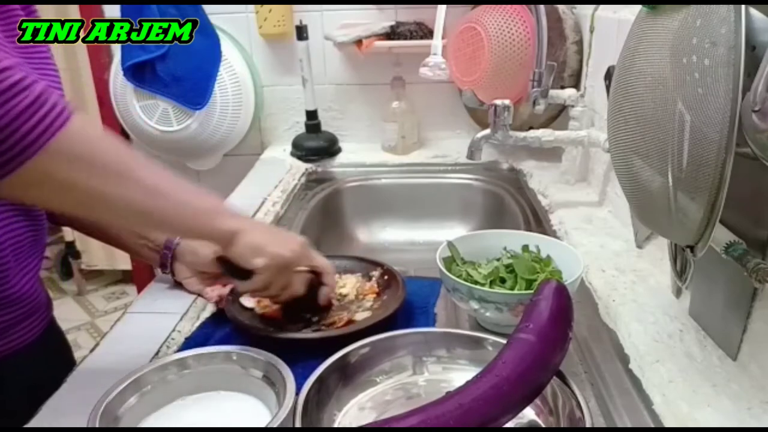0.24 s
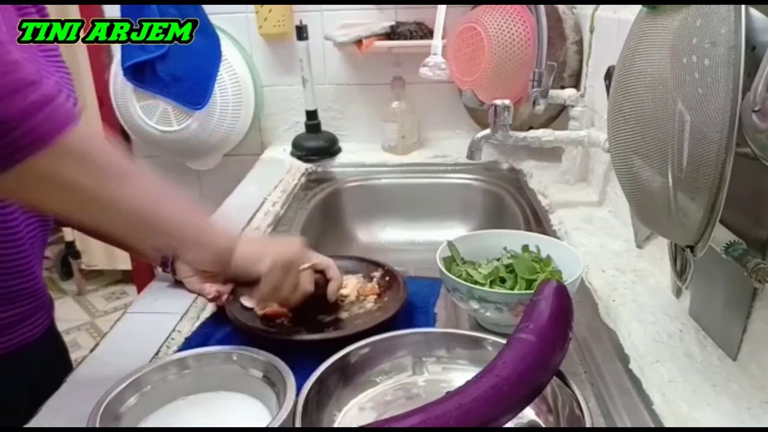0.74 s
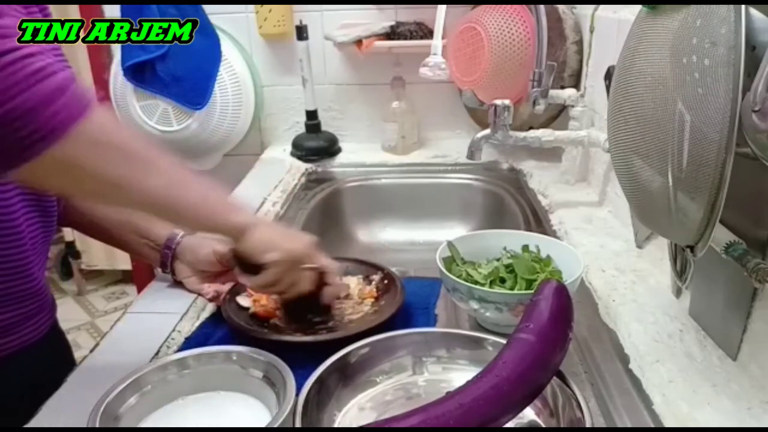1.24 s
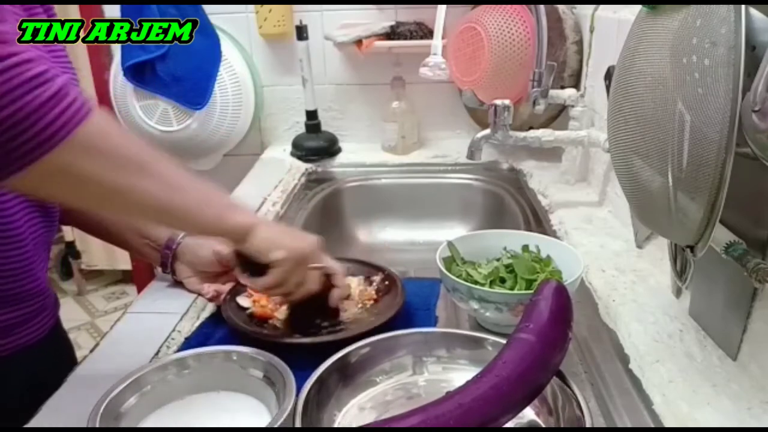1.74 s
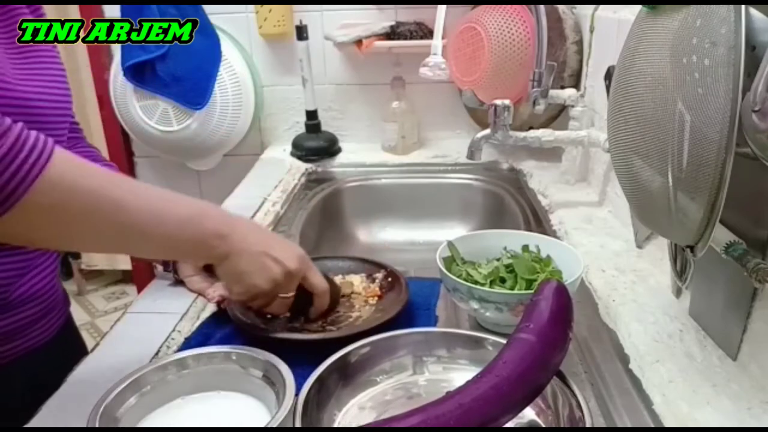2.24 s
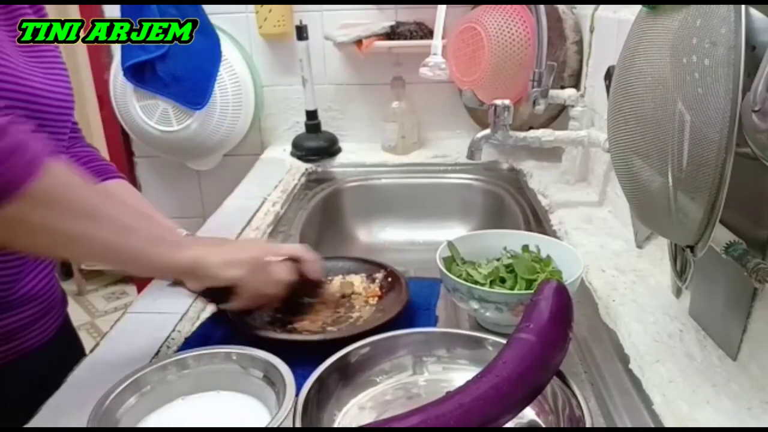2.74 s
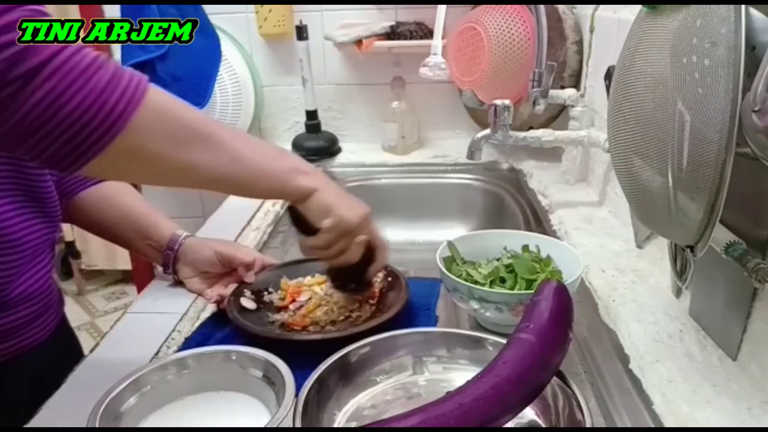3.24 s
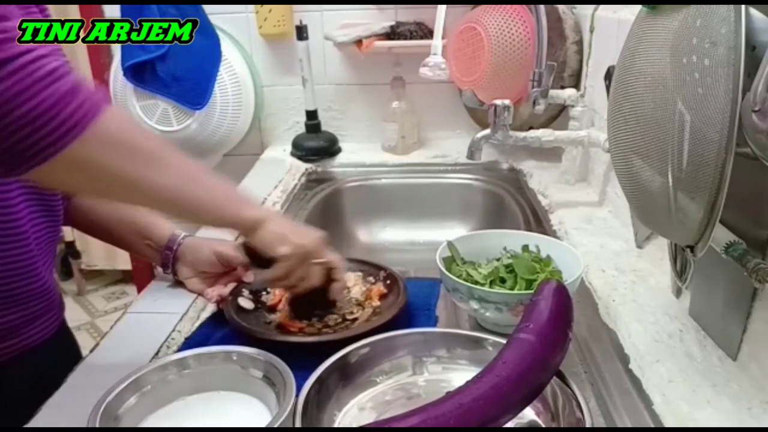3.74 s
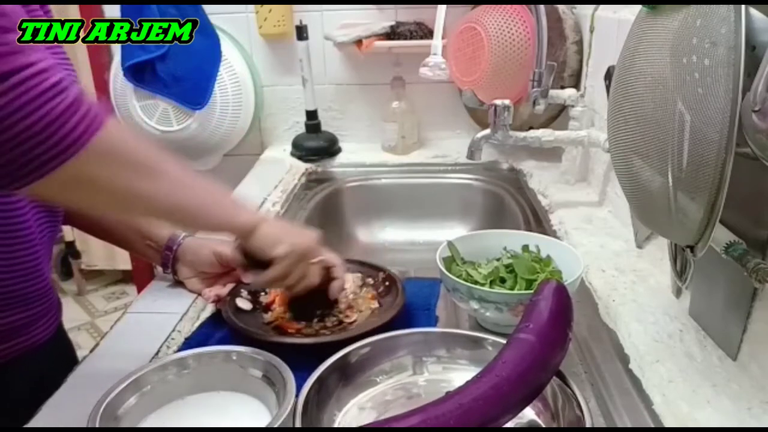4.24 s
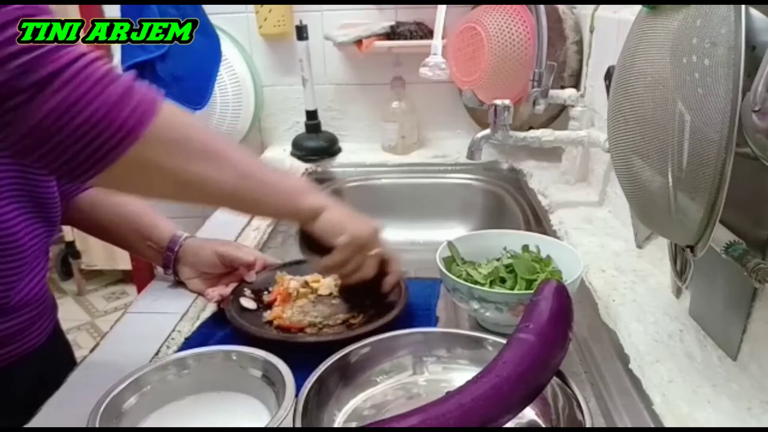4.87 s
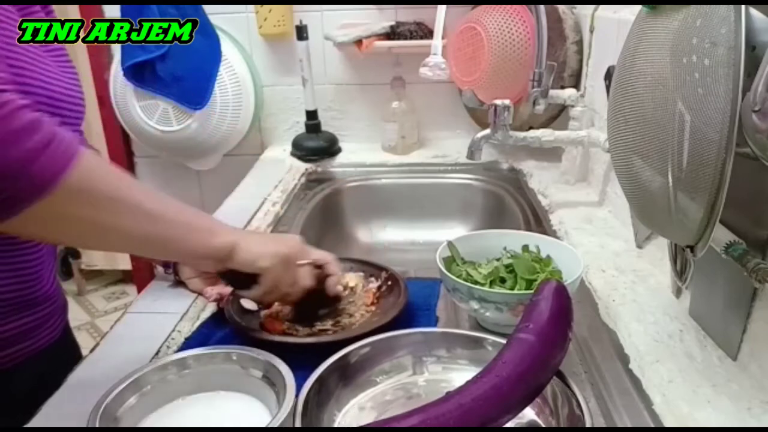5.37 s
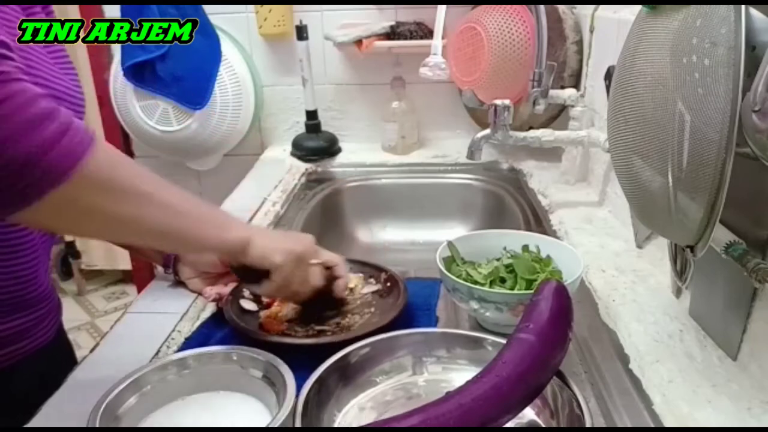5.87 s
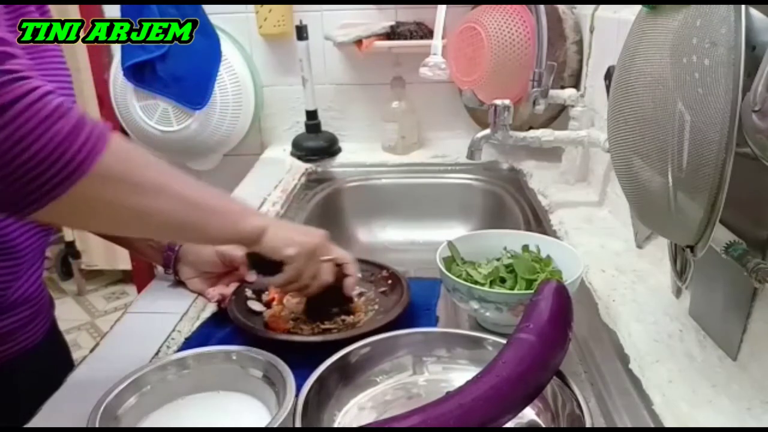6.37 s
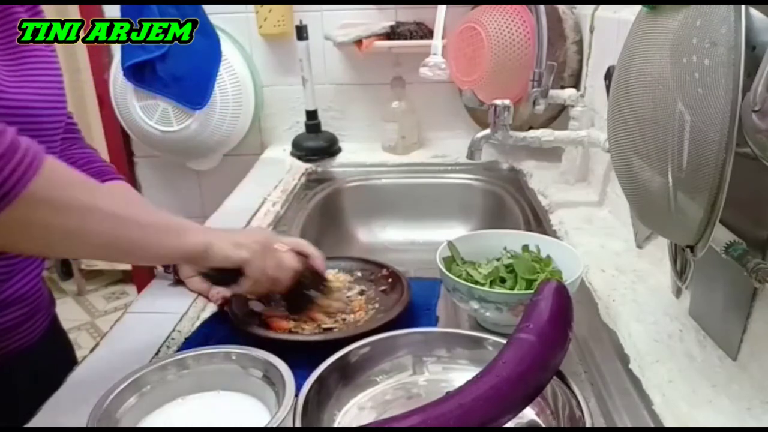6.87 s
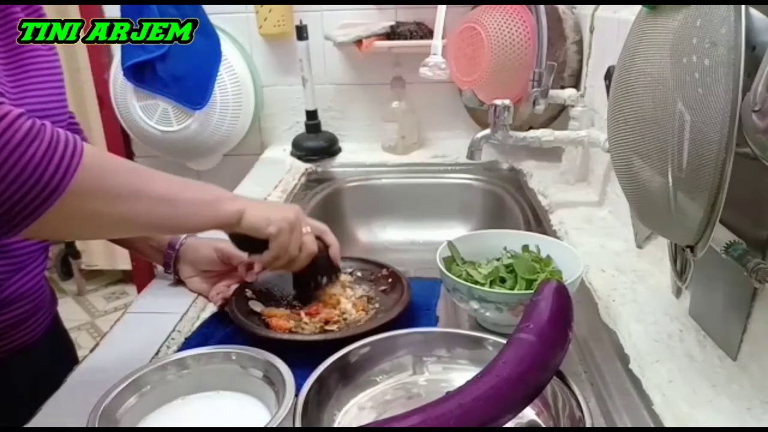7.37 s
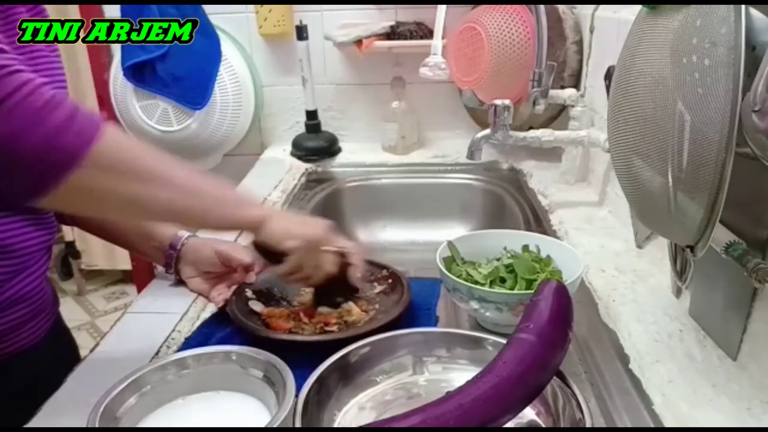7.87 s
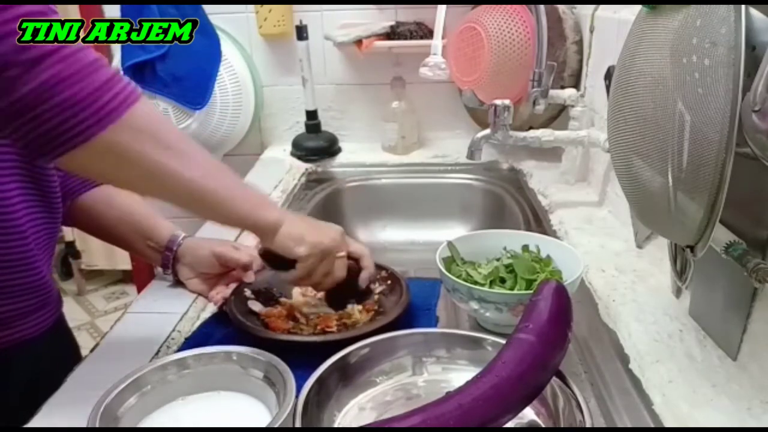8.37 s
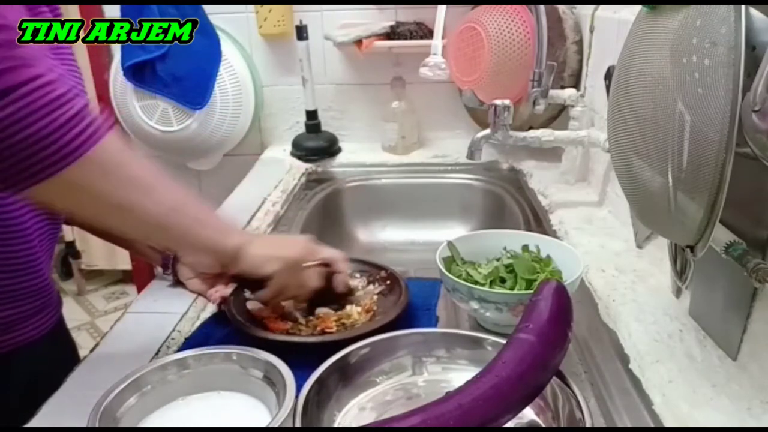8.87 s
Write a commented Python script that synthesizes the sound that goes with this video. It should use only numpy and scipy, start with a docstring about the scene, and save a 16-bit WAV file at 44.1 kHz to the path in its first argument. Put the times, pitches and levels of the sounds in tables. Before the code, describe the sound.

A stone pestle rubs spices around a shallow stone mortar in quick, gritty, uneven strokes. The scrapes come in rounds with brief pauses, mixed with small crunches and knocks that ring the bowl briefly. One harder knock lands about two thirds of the way through. The counter rumbles softly under the pushes. It is heard close up in a home kitchen with a short echo, a low hum and faint room noise.

```python
"""Quick, gritty strokes come in rounds: a stone pestle rubbing spices round a shallow stone mortar.
Crushed grit and knocks of stone on stone ring the bowl; the tiled kitchen counter rumbles with the pushes.
Behind it lie a low hum, a few thin far tones and faint room noise.
Two microphones, a few centimetres apart, hear the mortar directly and the kitchen's short echo after it."""
import sys
import numpy as np
from scipy import signal
from scipy.fft import rfft, irfft, next_fast_len
from scipy.io import wavfile
from scipy.ndimage import uniform_filter1d

SR = 44100
rng = np.random.default_rng(int(sys.argv[2]) if len(sys.argv) > 2 else 0)


def materialize(psi):
    """Save the field psi as 16-bit PCM at rate SR to the path in sys.argv[1].

    A 1-D psi becomes a single channel; in a 2-D psi each row is a channel.
    """
    bounded = np.clip(np.atleast_2d(psi).T, -1, 1)
    quanta = np.round(bounded * 32767).astype(np.int16)
    wavfile.write(sys.argv[1], SR, quanta)


N = 401745
FFT_SIZE = next_fast_len(N + 8192, real=True)
TIME_S, FFT_HZ = np.arange(N) / SR, np.fft.rfftfreq(FFT_SIZE, 1 / SR)
TICKS_S = np.arange(0, N + 44, 44) / SR  # control points for the envelopes

# The ring that the rubbing drives hardest, moving with the pestle's place in the bowl: time_s, pitch_hz
PESTLE_PATH = [(0.0, 2970), (0.1, 1820), (0.15, 2390), (0.53, 2460), (0.61, 1920), (0.66, 2800),
               (0.83, 2150), (1.22, 2450), (1.47, 1830), (1.7, 2600), (1.75, 2080), (2.36, 2420),
               (2.48, 1820), (2.76, 1860), (2.79, 2130), (3.14, 2320), (3.22, 2970), (3.47, 1900),
               (3.55, 2790), (3.6, 2230), (4.2, 2300), (4.36, 2120), (4.91, 2300), (4.99, 1960),
               (5.25, 2020), (5.3, 2660), (5.42, 1870), (5.58, 2270), (5.73, 1900), (6.13, 2420),
               (6.21, 1700), (6.36, 1720), (6.41, 2300), (6.61, 2280), (6.77, 1520), (6.92, 2200),
               (6.95, 1480), (7.15, 2250), (7.22, 1494), (7.5, 1550), (7.53, 2570), (7.73, 1940),
               (7.93, 1960), (7.96, 2890), (8.19, 2200), (8.36, 2830), (8.41, 2260), (9.1, 2240)]


def grinding(laps_per_s=3.3, spots=5):
    """The pestle bears on several spots at once and circles among them; each rings the bowl its own way."""
    rub_gains = strokes()
    blows = gain_of(-9.5) * knocks()
    lap = 2 * np.pi * (laps_per_s * TIME_S + 0.16 * flutter(0.17))
    ring_hz = np.interp(TIME_S, *np.transpose(PESTLE_PATH))
    spectrum = 0
    for spot in range(spots):
        share = np.sqrt((1 + np.cos(lap + 2 * np.pi * spot / spots)) / spots)
        edge = grit(grains_per_s=1100, spread_db=3.9, friction=0.84)
        crackle = grit(grains_per_s=1200, spread_db=3.85, friction=0.8)  # small seeds and skins burst
        scrape = favour_ring(edge, ring_hz, width_hz=750, lift_db=-4.3)
        weight = edge[::-1]  # reversed: the slow pressing is unrelated to the grains at the edge
        contact = share * (rub_gains * [scrape, weight, crackle, weight, crackle] + blows)
        spectrum = spectrum + (rfft(contact, FFT_SIZE)[:, None] * rfft(mortar(), FFT_SIZE)).sum(0)
    return irfft(spectrum, FFT_SIZE)[:, :N]


# Pushes of the pestle, the last three columns relative to the scrape:
# hardest_s, scrape_db, swell_ms, fade_ms, low_db, hiss_db, boom_db
STROKES = [(0.048, -79, 101, 119, -4, 10.5, -1), (0.205, -56.5, 57, 73, -1.5, -1, -7.5),
           (0.3, -69, 78, 53, -3, 3.5, -21), (0.4, -61.5, 62, 75, -6, 3.5, -6.5),
           (0.56, -52.5, 64, 52, -5.5, -8, -4.5), (0.63, -80.5, 60.0, 82, 10.5, 8, 5.5),
           (0.838, -63.5, 253, 39, 9.5, -4, -3), (0.86, -67, 29, 281.0, -11, 10, -23.0),
           (0.997, -46, 43, 52, -3, -9.5, -6.5), (1.151, -50, 34, 56, -3.5, -4, -1),
           (1.286, -53, 79, 68, -2.5, 1, -7), (1.441, -45, 52, 37, -8, -7, -20),
           (1.572, -49.5, 58, 46, -4.5, -4, -18), (1.62, -67, 252, 125, -1, 7.5, -15),
           (1.782, -72, 100.0, 185, 18, -9, -7), (1.896, -51, 82, 60, -2, -1.5, -4),
           (2.01, -48.5, 45, 72, -1.5, -3.5, 0), (2.168, -67, 104, 8.5, 5, 2, -11),
           (2.202, -53, 24, 31, -12, -6, -34), (2.347, -64, 133, 115, 7.5, 9.5, -22.0),
           (2.383, -53, 126, 83, -22, -11, -20), (2.934, -49.5, 106, 105, 4, -4.5, 1),
           (3.14, -65, 122, 34, -7, 4, -24), (3.209, -64, 100.0, 159, -7.5, 9, -13),
           (3.299, -64.5, 63, 53, -12, 6, -15), (3.549, -72.5, 34, 4, -17.0, 15.5, -23),
           (3.638, -61, 107, 263.0, -7.5, 0.5, -19), (3.755, -54.5, 30, 25, 1, -2, -19),
           (3.799, -55, 54, 62, -1.5, -2, -6), (3.917, -55.5, 45, 99, -16, 0.5, -14),
           (4.045, -60, 27, 58, -7.5, 3.5, -5), (4.142, -66, 250.0, 40, -2.5, 3.5, -8),
           (4.343, -61.5, 80, 104.0, 4.5, 1.5, 1), (4.388, -48.5, 23, 40, -1.5, -3, -11),
           (4.536, -53, 99, 48, -0.5, 2.5, -8.5), (4.674, -54, 45, 70, -1.5, 4.5, -4.5),
           (4.819, -53, 58, 70, 0.5, -0.5, -1), (5.066, -64.5, 133, 25, 7.5, -9, -3),
           (5.116, -60.5, 74, 30, 3.5, 3, 4), (5.145, -54.5, 19, 77, -1.5, -3, -17),
           (5.332, -55, 116, 26, -4.5, -1.5, -7), (5.42, -55, 40, 105, -7, 0, -4),
           (5.633, -58, 112, 13, -12, 0, -7), (5.656, -59.5, 18, 55, -1, -5, -21),
           (5.827, -63.5, 20, 83, 3, -9, -1.5), (5.927, -56, 66, 83, -5, 2.5, -7.5),
           (6.061, -60.5, 54, 93, -3, 0.5, -5), (6.237, -81, 251, 303, 8, -1, -20),
           (6.314, -43.5, 94, 78, 5, -9, -8), (6.405, -55.5, 23, 88, 2, -3.5, -4),
           (6.552, -56.5, 88, 66, -5, -7.5, -6), (6.935, -66.5, 27, 63, -12, -11, -21),
           (7, -52.5, 248, 54, 8, -7.5, 10), (7.067, -56.5, 131, 67, 5, -6.5, 3.5),
           (7.149, -72, 18, 79, 3, 6, -24), (7.47, -87, 39, 24, -10, 7, -2),
           (7.541, -67.5, 33, 163.0, -4, 4, -10), (7.593, -60.5, 19, 89, 0, -4, -11),
           (8.005, -78, 77, 302, -19, 6.5, -19), (8.148, -66, 40, 49, 15, 7.5, 4),
           (8.207, -52.5, 44, 54, 0, -2.5, -11), (8.35, -55.5, 59, 58, -1, 0.5, -8),
           (8.5, -50.5, 101, 38, 2.5, -4, -6.5), (8.645, -46, 49, 30, -3.5, -3, -5),
           (8.753, -53, 62, 110, -0.5, -2.5, 2), (8.919, -43, 48, 46, -8, -6.5, -14),
           (9.044, -50.5, 79, 63, -3.5, -4, -3.5)]
# The pestle lands after a lift; no stroke swells before its landing: time_s
LANDINGS = [.778, 1.782, 3.208, 5.018, 5.813, 6.308, 6.4, 6.539, 6.923, 6.98, 7.968, 8.438]
# Rounds in which the pestle stays on the stone, dragging lightly between strokes: start_s, end_s, scrape_db
ROUNDS = [(0, .68, -80), (.84, 1.72, -75), (1.792, 2.476, -70), (2.827, 3.4, -71.5), (3.532, 4.204, -75),
          (4.25, 4.98, -75), (5.024, 5.745, -79), (5.799, 6.23, -76), (6.292, 6.65, -69.5),
          (7.975, 9.2, -68)]


def strokes(touch_s=0.0065, lift_s=0.07, stutter_db=(1.8, 1.8, 2.2, 1.8, 4.5)):
    """Gains of the rubbing in the five bands; the pestle catches and slips, so the level stutters."""
    power = 0
    for hardest_s, scrape_db, swell_ms, fade_ms, *colour_db in STROKES:
        landed = TICKS_S > max([0] + [at for at in LANDINGS if at <= hardest_s])
        push = hump(hardest_s, swell_ms, fade_ms) * landed
        power = power + band_gains(scrape_db, *colour_db) ** 2 * push
    for start_s, end_s, scrape_db in ROUNDS:
        touching = np.clip(np.minimum((TICKS_S - start_s) / touch_s, (end_s - TICKS_S) / lift_s), 0, 1)
        drag = band_gains(scrape_db, low_db=-6.5, hiss_db=-0.5, boom_db=-14.5)
        power = power + (drag * touching) ** 2
    gains = np.array([envelope(band) for band in power])
    catch_db = flutter(0.019)  # shared by all bands
    sputter_db = [db * flutter(0.0093) for db in stutter_db]  # the top hiss sputters most
    return gains * evened(gain_of(catch_db + sputter_db))


def grit(grains_per_s, spread_db, friction):
    """Crushed grains click at random over the noise of smooth friction."""
    sizes = gain_of(spread_db * np.minimum(rng.exponential(1, N), 5)) * rng.choice([-1., 1.], N)
    grains = evened(sizes * (rng.random(N) < grains_per_s / SR))
    return evened(grains + friction * rng.standard_normal(N))


# Knocks and crunches in the bowl, low and hiss relative to the knock's strength:
# time_s, strength_db, low_db, hiss_db, chatter_t60_s, ring_hz, low_ring_hz
KNOCKS = [(0.352, -70, -18, 18, .02, 2400, 500), (0.4805, -66.5, -20, 23.5, .03, 2400, 500),
          (0.5595, -36.5, -24, -15, 0.037, 2300, 590), (0.552, -59, -25, 18, .04, 2400, 590),
          (0.7787, -34.5, -5, -13, 0.066, 2380, 640), (0.842, -38.5, -5.5, -5, 0.041, 2300, 990),
          (0.9429, -60, -15, 10, .04, 2400, 500), (0.9732, -42, -25, -7, 0.052, 2310, 500),
          (1.1123, -55, -17, 14.5, 0.27, 3300, 326), (1.3893, -65.5, -18, 20, 0.24, 1830, 250),
          (1.4161, -46, 2, 2, 0.16, 1810, 318), (1.4358, -31, -21, -6, 0.025, 1800, 330),
          (1.5585, -44, -16, 4, 0.031, 2400, 330), (1.782, -45.5, 2, -0.5, 0.047, 1730, 650),
          (1.8228, -60, 18.5, 19, 0.042, 2100, 596), (1.9801, -54, -1, -6, 0.043, 2480, 330),
          (2.008, -42, -5, 1, 0.09, 1990, 330), (2.156, -44.5, -15, -8, 0.033, 1500, 600),
          (2.193, -53, -10, -7, 0.045, 2400, 595), (2.202, -43.5, -2, 5.5, 0.033, 2350, 620),
          (2.371, -37, -15, -15, 0.084, 1840, 330), (2.39, -41, -29, -9, 0.049, 2300, 330),
          (2.8314, -53, -11, 0, 0.082, 2320, 330), (2.8808, -52, 5, 8.5, 0.15, 2200, 485),
          (2.915, -40.5, 6.5, -34, 0.14, 1880, 490), (3.127, -44.5, -21.5, -0.5, 0.097, 2200, 345),
          (3.2117, -34, -31, -5, 0.069, 3150, 293), (3.5315, -67, -17, 14, .04, 2700, 500),
          (3.6405, -42, -26, -21, 0.12, 2260, 310), (3.744, -62, 9, -10, 0.14, 1990, 1140),
          (4.0482, -57, -20, 10, 0.037, 2300, 600), (4.3228, -48, -9, -2, .03, 2300, 500),
          (4.385, -32.5, -15.5, -11, 0.11, 1830, 497), (4.4782, -58, -18, 19.5, 0.054, 2100, 600),
          (4.5241, -34.5, -15, -5, 0.09, 2250, 576), (4.6621, -31.5, -28, -12, 0.096, 2120, 295),
          (5.0171, -50, -6.5, -5, 0.13, 1730, 365), (5.1441, -39, -9, -14, 0.071, 1770, 330),
          (5.3029, -35, -19, 4, 0.076, 2700, 293), (5.4095, -36.5, -11.5, -19, 0.11, 1840, 1040),
          (5.6591, -42, -12.5, -4.5, 0.057, 2150, 503), (5.8132, -61, -3, 3, 0.072, 1970, 497),
          (5.889, -57, -19, 16, 0.071, 2200, 505), (6.0619, -36.5, -26, -17, 0.045, 2430, 321),
          (6.114, -69, -17, 3.5, .02, 2400, 500), (6.278, -61, -11.5, 3, 0.19, 2320, 361),
          (6.3083, -15.5, -14, -39, 0.12, 1600, 754), (6.4006, -33.5, -10, -5, 0.069, 2300, 630),
          (6.5391, -53, -22, 4, 0.084, 1900, 493), (6.923, -49, -24, -14, 0.037, 2270, 560),
          (6.954, -65, -17, 10, 0.068, 2300, 490), (6.981, -27.5, -3, -23, 0.085, 1490, 1050),
          (7.0731, -42.5, 1, -3, 0.052, 2140, 604), (7.968, -63, -7, 3, 0.054, 2770, 503),
          (8.4376, -46, -11, -19, 0.09, 2270, 940), (8.508, -47, -16, 16, 0.032, 2300, 500),
          (8.5952, -56, -5, 16.5, 0.045, 2300, 493), (8.6312, -44, -15, -1, 0.048, 2200, 500),
          (8.65, -44, -11, -4, .03, 1900, 500), (8.731, -33.5, -14.5, -4.5, 0.13, 2300, 490),
          (8.8943, -45, -4, -23, 0.21, 2420, 440), (8.927, -34, -22, -6, 0.024, 1870, 500),
          (9.002, -46, -9, -1, .04, 2400, 500), (9.0417, -43, 0, 6.5, 0.091, 2440, 510)]


def knocks(blow=2.41, blow_s=0.000083, rise_s=0.0026, lead_s=0.001032):
    """Stone on stone, in the five bands: one sharp blow, then a dying chatter of small contacts."""
    t, out = np.arange(SR // 5) / SR, np.zeros((5, N + SR))
    for time_s, db, low_db, hiss_db, t60_s, ring_hz, low_ring_hz in KNOCKS:
        shape = (1 - np.exp(-t / rise_s)) * gain_of(-60 * t / t60_s)
        chatter = shape * rng.standard_normal((2, len(t)))
        chatter *= np.linalg.norm(shape) / np.linalg.norm(chatter, axis=1)[:, None]
        edge, weight = chatter + blow * np.exp(-t / blow_s)  # each shakes the stone separately
        deep = favour_ring(weight, low_ring_hz, width_hz=180, lift_db=0.49)
        bright = favour_ring(edge, ring_hz, width_hz=520, lift_db=4)
        cutoff_hz = np.clip(4800 * gain_of(-0.5 * (db + 38)), 1500, 15000)  # heavier: longer, so duller
        dulled = signal.lfilter(*signal.butter(2, cutoff_hz, fs=SR), bright)
        gains = band_gains(db, low_db, hiss_db, boom_db=low_db - 3, top_db=-26.5)
        start = round((time_s - lead_s) * SR)
        out[:, start:start + len(t)] += gains * [dulled, deep, edge, deep, edge]
    return out[:, :N]


# Modes of the stone bowl before the paste damps them: pitch_hz, relative_db, t60_s
MORTAR_MODES = [(267, -31, 0.36), (352, 11, 0.23), (487, 5, 0.22), (516, 3, 0.39), (600, 7, 0.63),
                (768.6, 2, 0.28), (824, -1.5, 0.047), (908, -2, 0.36), (1000, -8, 0.12), (1172, 3.5, 0.15),
                (1300, 4.5, 0.049), (1522, 1.5, 0.016), (1610, 11, 0.068), (1743, 18.5, 0.022),
                (1882, 8.5, 0.13), (2033, 5.5, 0.063), (2510, 14, 0.017), (2323, 10, 0.11), (2760, 9, 0.03),
                (2975, 13.5, 0.11), (3474, 15.5, 0.028), (4790, 7, 0.013), (5720, 15, 0.0016),
                (5950, 16, 0.028)]
# Contact noise between the modes: frequency_hz, relative_db
CONTACT_SPECTRUM = [(150, -15.5), (250, -15), (290, 0.5), (400, -18.5), (800, -15.5), (1300, -8),
                    (2000, -7.5), (3000, -3), (3700, -5.5), (4500, -5), (5200, -1.5), (6200, -1.5),
                    (7400, -8), (9000, -23), (11000, -18.5), (15500, -19.5)]
# The bowl's lean toward the left microphone; each microphone takes a share of it: frequency_hz, lean_db
MIC_LEAN = [(200, 0.5), (380, -9), (700, 12), (1300, 17), (2400, 6.5), (4400, 5.5), (8000, 1),
            (13000, -5.5)]
# The five bands (scrape, low body, hiss, boom, top hiss): low_hz, high_hz
BANDS = [(1450, 4100), (410, 1200), (3600, 9300), (230, 450), (8800, 20000)]


def mortar(ring_db=-4.0, bounce_db=-1.5, spot_spread_db=3, paste_damping_per_s=9.0):
    """The bowl's answer to a tiny blow at one spot, at each microphone, in five bands of equal energy."""
    t, hz = np.arange(8192) / SR, np.fft.rfftfreq(8192, 1 / SR)
    mode_hz, mode_db, t60_s = np.transpose(MORTAR_MODES)[:, :, None]
    t60_s = 1 / (1 / t60_s + paste_damping_per_s)
    mode_db = mode_db + spot_spread_db * rng.standard_normal(mode_hz.shape)
    decays = gain_of(mode_db - 60 * t / t60_s) / np.sqrt(t60_s)
    shared_phase = rng.random(mode_hz.shape)
    phase_spread = np.clip(mode_hz / 886, 0, 1)  # low modes reach both microphones nearly in step
    click = rfft(evened(minimum_phase(curve_at(CONTACT_SPECTRUM, hz))))
    mics = []
    for lean_share, delay_samples in ((0.295, 0.66), (0.016, rng.uniform(1.6, 10.55))):  # left, right
        phase = shared_phase + phase_spread * rng.random(mode_hz.shape)
        ring = (decays * np.sin(2 * np.pi * (mode_hz * t + phase))).sum(0)
        bounces = rng.standard_normal(len(t)) * gain_of(-60 * t / 0.027)  # off bowls and tiles close by
        paths = 1 + gain_of(bounce_db) * rfft(bounces / np.linalg.norm(bounces))
        body = click * paths + gain_of(ring_db) * rfft(evened(ring))
        lean = gain_of(lean_share * curve_at(MIC_LEAN, hz))
        delay = np.exp(-2j * np.pi * hz * delay_samples / SR)
        mics.append(irfft(body * lean * delay))
    bands = [signal.sosfilt(signal.butter(5, edges, "band", fs=SR, output="sos"), mics) for edges in BANDS]
    return np.array([band / np.sqrt((band ** 2).sum() / 2) for band in bands])


def band_gains(scrape_db, low_db, hiss_db, boom_db, top_db=-23.0):
    """Gains of the five bands; the finest hiss grows faster than the rest as the pestle presses harder."""
    top_hiss_db = hiss_db + top_db + 0.45 * (scrape_db + hiss_db + 60)
    return gain_of(scrape_db + np.array([0, low_db, hiss_db, boom_db, top_hiss_db]))[:, None]


def favour_ring(force, hz, width_hz, lift_db):
    """Contact at one spot drives the modes near hz harder; the power stays about the same."""
    carrier = np.exp(2j * np.pi * np.cumsum(hz * np.ones(len(force))) / SR)
    pole = np.exp(-np.pi * width_hz / SR)
    # Shift hz down to zero, smooth, shift back: a resonance that can glide.
    resonance = 2 * (carrier * signal.lfilter([1 - pole], [1, -pole], force / carrier)).real
    lift = gain_of(lift_db) * np.sqrt(SR / (2 * np.pi * width_hz))
    return (force + lift * resonance) / np.sqrt(1 + gain_of(2 * lift_db))


def shifting_colour(sound, patchy_db=2.5):
    """Hand, pestle and paste keep moving, so patches of the spectrum come and go from stroke to stroke."""
    frames = signal.stft(sound, nperseg=512, noverlap=384)[2]
    patches = uniform_filter1d(rng.standard_normal(frames.shape[1:]), size=5, axis=0)  # across frequency
    patches = uniform_filter1d(patches, size=22, axis=1)  # across time
    gains = evened(gain_of(patchy_db * evened(patches)))
    return signal.istft(frames * gains, nperseg=512, noverlap=384)[1][:, :N]


# Decay of the kitchen around the counter: frequency_hz, t60_s
KITCHEN_DECAY = [(200, 0.11), (1000, 0.21), (3000, 0.13), (8000, 0.21)]


def kitchen_echo(sound, gap=20):
    """Sparse reflections of random sign, one in every gap samples, each band dying at its own speed."""
    taps = np.zeros((2, SR // 2))
    slots = np.arange(200, SR // 2 - gap, gap)
    arrivals = slots + rng.integers(0, gap, (2, len(slots)))
    np.put_along_axis(taps, arrivals, rng.choice([-1., 1.], arrivals.shape), 1)
    hz, t, frames = signal.stft(taps, SR, nperseg=256)
    decay = gain_of(-60 * t / curve_at(KITCHEN_DECAY, hz)[:, None])
    tail = signal.istft(frames * decay, SR, nperseg=256)[1]
    return signal.fftconvolve(sound, tail / np.linalg.norm(tail[0]), axes=1)[:, :N]


# The low hum, and the thump of the counter under the mortar: frequency_hz, relative_db
HUM_SPECTRUM = [(41, -26.5), (70, -40.5), (97, -0.5), (129, 6.5), (158, -4.5), (230, -17.5), (300, -99),
                (510, -120)]
THUMP_SPECTRUM = [(20, -5), (42, -24), (58, 11.5), (70, -30.5), (86, 20), (102, 5.5), (115, -3),
                  (140, -51.5)]
# Swells of both, mostly with the pushes: peak_s, thump_db, hum_db, swell_and_fade_ms
RUMBLE_SWELLS = [(0.05, -88.5, -54, 42), (0.23, -61, -54, 79), (0.34, -53, -55.5, 58), (0.57, -61, -55, 99),
                 (0.71, -66, -57, 55), (0.84, -65, -54.5, 129), (1.03, -56, -52.5, 107),
                 (1.3, -57, -56, 59), (1.469, -66, -53.5, 198), (1.58, -55, -75, 163), (1.83, -66, -53, 98),
                 (2.16, -65, -59.5, 324), (2.41, -93, -58, 274), (2.57, -66, -60, 50),
                 (2.72, -99, -51.5, 106), (2.96, -60.5, -56.5, 246), (3.36, -65.5, -71, 282),
                 (3.58, -79, -57, 130.0), (3.79, -53, -54, 85), (3.95, -67, -55, 47),
                 (4.16, -63.5, -58, 192), (4.47, -60, -56, 288), (4.7, -66, -54, 140.0),
                 (4.85, -62, -54.5, 89), (5.13, -62.5, -53.5, 223), (5.32, -60, -55.5, 122),
                 (5.57, -73, -55, 92), (5.72, -65, -56, 109), (5.97, -63, -57, 238),
                 (6.33, -56.5, -57, 134), (6.6, -61, -57, 81), (6.85, -87, -57, 54),
                 (7.05, -53.5, -53.5, 169), (7.37, -74, -55, 284), (7.72, -77, -51, 57),
                 (8.19, -53.5, -52.5, 106), (8.36, -68, -60.5, 142), (8.53, -54.5, -52, 156),
                 (8.8, -46, -48, 98), (9.069, -58.5, -57, 102)]


def rumble(resting_hum_db=-62.5, resting_thump_db=-81.5, side_db=-25):
    """A lumpy low hum and the counter's thump, nearly alike at both microphones."""
    hum_power, thump_power = gain_of(2 * resting_hum_db), gain_of(2 * resting_thump_db)
    for peak_s, thump_db, hum_db, ms in RUMBLE_SWELLS:
        swell = hump(peak_s, ms, ms)
        hum_power += gain_of(2 * hum_db) * swell
        thump_power += gain_of(2 * thump_db) * swell
    hum = noise_pair(HUM_SPECTRUM) * envelope(hum_power)
    thump = noise_pair(THUMP_SPECTRUM) * envelope(thump_power)
    mid, side = hum + thump
    return mid + gain_of(side_db) * side * [[1], [-1]]


# Thin tones far from the microphones: start_s, length_s, pitch_hz, left_db, right_db
FAR_TONES = [(0.6, 0.185, 2784, -69.5, -68), (1.72, 0.08, 2785, -79, -78), (7.13, 0.21, 1465, -81, -75),
             (7.36, 0.16, 1465, -76.5, -75), (7.41, 0.1, 1550, -79, -79), (7.39, 0.08, 1034, -79, -79),
             (0.326, 0.2, 787, -67, -70), (0.65, 0.14, 792, -67, -70), (6.77, 0.08, 780, -72, -74)]


def far_tones(fade_s=0.045, drift_cycles=0.16, waver_db=2.0):
    """Brief sine tones that swell and fade, wavering differently at each microphone."""
    out = np.zeros((2, N))
    for start_s, length_s, pitch_hz, *levels_db in FAR_TONES:
        fade = np.clip(np.minimum(TIME_S - start_s, start_s + length_s - TIME_S) / fade_s, 0, 1)
        for mic, level_db in zip(out, levels_db):
            amplitude = np.sqrt(2) * gain_of(level_db + waver_db * flutter(0.02))
            cycles = pitch_hz * TIME_S + drift_cycles * flutter(0.18) + rng.random()
            mic += fade * amplitude * np.sin(2 * np.pi * cycles)
    return out


# The kitchen's background noise: frequency_hz, relative_db
ROOM_SPECTRUM = [(120, -51), (220, -8.5), (400, -7), (750, -7), (1250, -15.5), (2000, -16.5), (3200, -23.5),
                 (4200, -35), (6500, -31), (8000, -44), (10000, -43.5), (15500, -53)]
# Its likeness at the two microphones: frequency_hz, correlation
ROOM_LIKENESS = [(100, 0.77), (300, 0.85), (700, 0.21), (2000, 0)]
# Its rise and fall: time_s, level_db
ROOM_LEVEL = [(0, -70), (.7, -67), (1.75, -73), (2.6, -71.5), (3.452, -72.5), (4.22, -72.5), (4.97, -73.5),
              (5.75, -71), (6.24, -79.5), (6.75, -70.5), (7.351, -70), (7.85, -71.5), (9.1, -86)]


def room_noise(waver_db=1.2):
    """Faint wavering noise heard in the pauses; its lows are much alike at both microphones."""
    left, unrelated = rfft(noise_pair(ROOM_SPECTRUM), FFT_SIZE)
    likeness = curve_at(ROOM_LIKENESS, FFT_HZ)
    right = likeness * left + np.sqrt(1 - likeness ** 2) * unrelated
    level_db = np.interp(TIME_S, *np.transpose(ROOM_LEVEL)) + waver_db * flutter(0.12)
    return gain_of(level_db) * irfft([left, right], FFT_SIZE)[:, :N]


def gain_of(db):
    return 10 ** (np.asarray(db) / 20)


def evened(x):
    """Scaled to an RMS of 1."""
    return x / np.sqrt(np.mean(x ** 2) + 1e-20)


def curve_at(points, hz):
    """A curve's value at hz, interpolated over log frequency."""
    points_hz, values = np.transpose(points)
    return np.interp(np.log(hz + 1), np.log(points_hz + 1), values)


def noise_pair(spectrum):
    """Two unrelated steady noises with the given spectrum."""
    white = rfft(rng.standard_normal((2, FFT_SIZE)))
    return evened(irfft(white * gain_of(curve_at(spectrum, FFT_HZ)))[:, :N])


def flutter(width_s):
    """A random waver of unit spread, smooth over width_s."""
    size = round(width_s * SR)
    return evened(uniform_filter1d(uniform_filter1d(rng.standard_normal(N), size), size))


def minimum_phase(db):
    """The shortest-delay impulse response with the given spectrum."""
    log_gain = np.log(gain_of(np.concatenate([db, db[-2:0:-1]])))
    return np.fft.ifft(np.exp(np.conj(signal.hilbert(log_gain)))).real


def hump(peak_s, swell_ms, fade_ms):
    """Power that climbs 20 dB over swell_ms to a rounded peak and falls 20 dB over fade_ms."""
    late_ms = 1000 * (TICKS_S - peak_s)
    width_ms = np.where(late_ms < 0, max(swell_ms, 10), max(fade_ms, 10))
    return gain_of(-40 * (late_ms / width_ms) ** 2)


def envelope(power):
    """Gain at every sample from power at the control points."""
    return np.interp(TIME_S, TICKS_S, np.sqrt(power))


def scene():
    """The mortar near the microphones, the kitchen behind it."""
    near = shifting_colour(grinding())
    return near + gain_of(-5.5) * kitchen_echo(near) + rumble() + room_noise() + far_tones()


def record(dry):
    """Both microphone channels lose their highest treble to a steep low-pass."""
    low_pass = signal.firwin(511, cutoff=15640, window=("kaiser", 9), fs=SR)
    return signal.oaconvolve(dry, low_pass[None], "same")


dry = scene()
out = record(dry)
materialize(out)
```